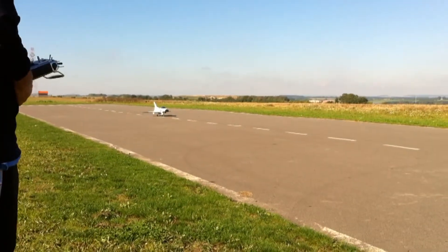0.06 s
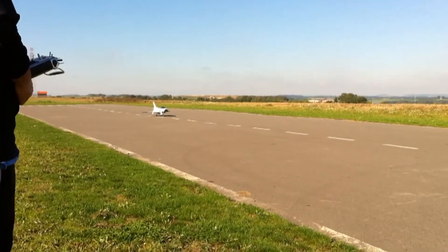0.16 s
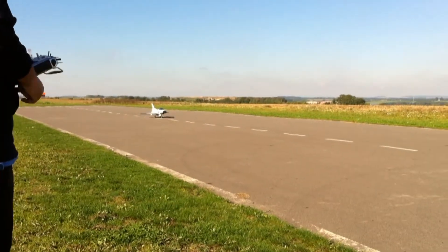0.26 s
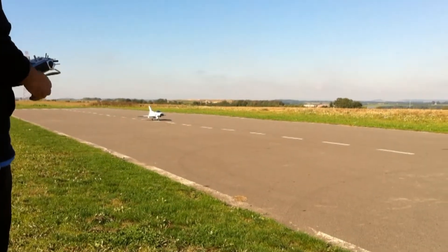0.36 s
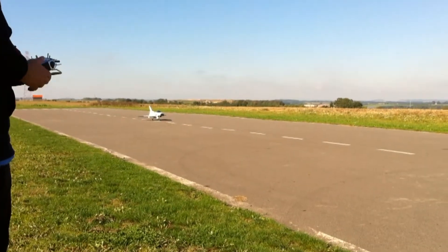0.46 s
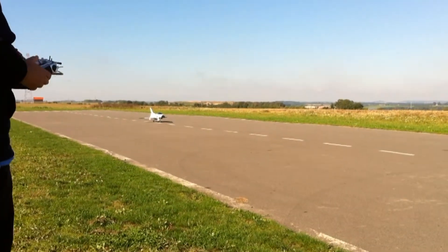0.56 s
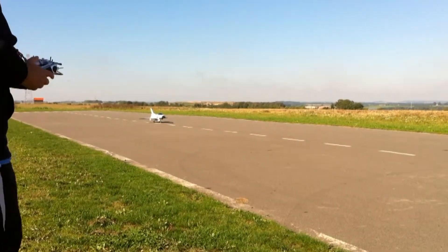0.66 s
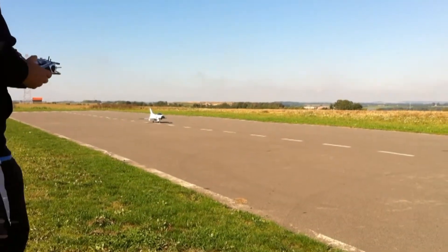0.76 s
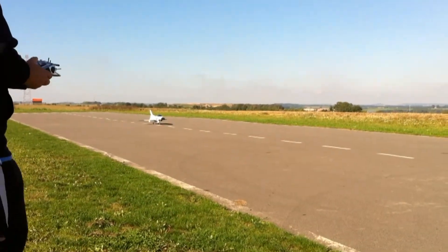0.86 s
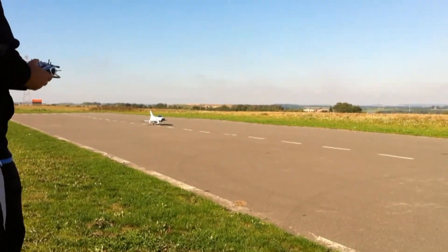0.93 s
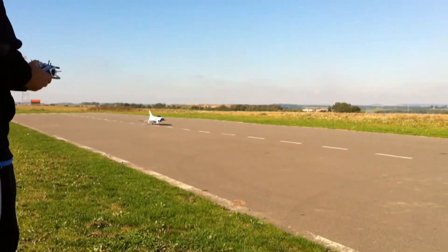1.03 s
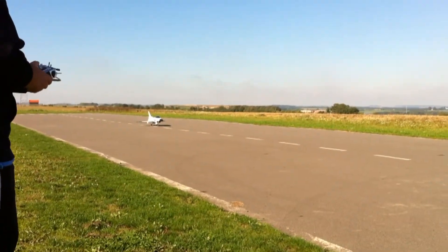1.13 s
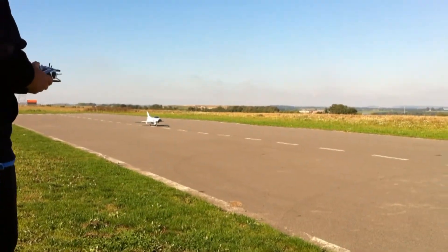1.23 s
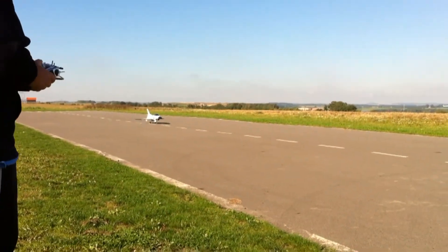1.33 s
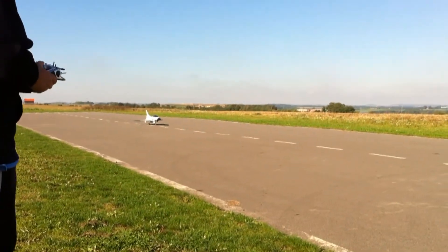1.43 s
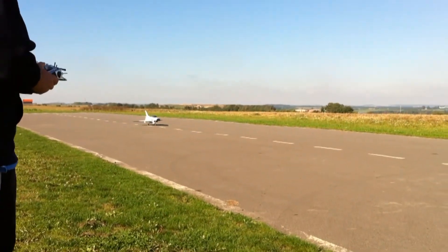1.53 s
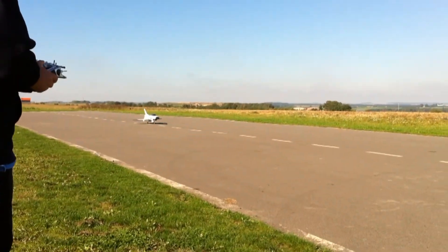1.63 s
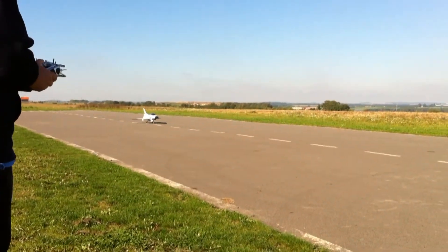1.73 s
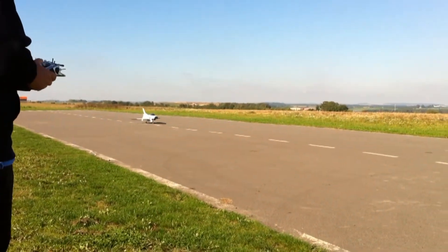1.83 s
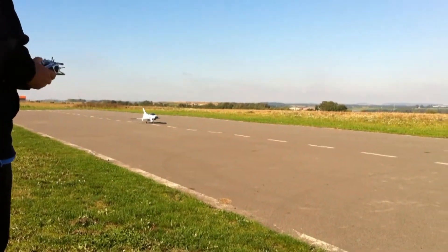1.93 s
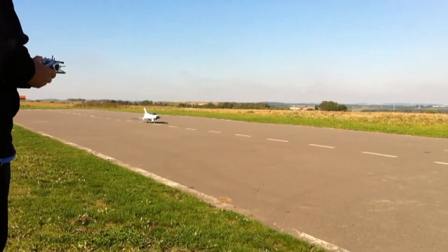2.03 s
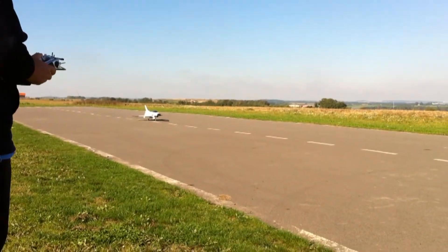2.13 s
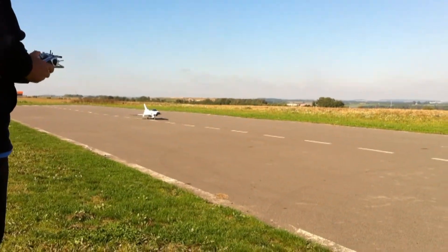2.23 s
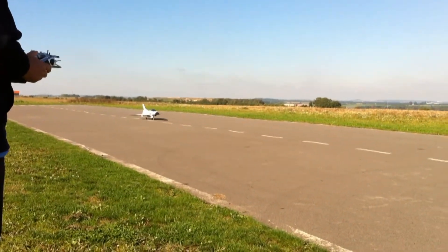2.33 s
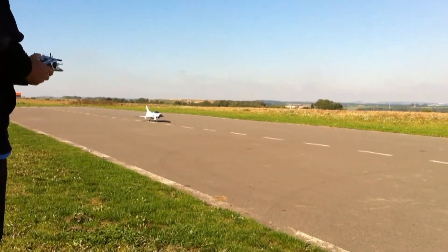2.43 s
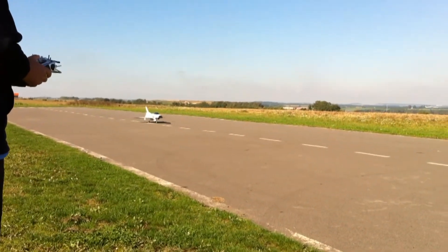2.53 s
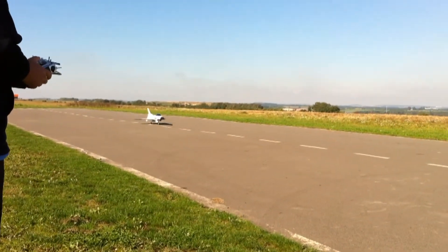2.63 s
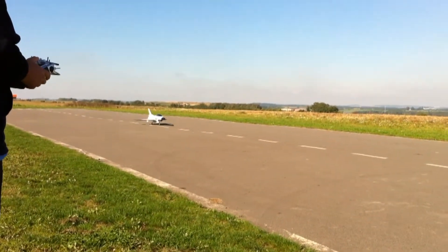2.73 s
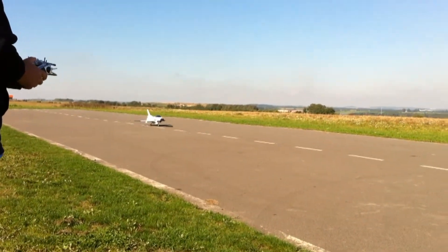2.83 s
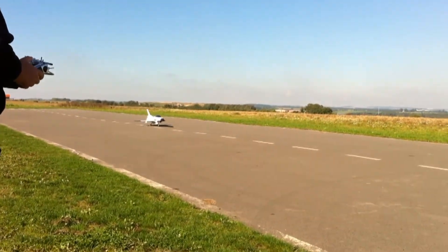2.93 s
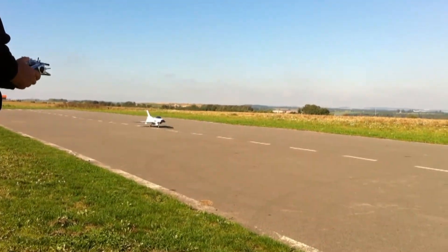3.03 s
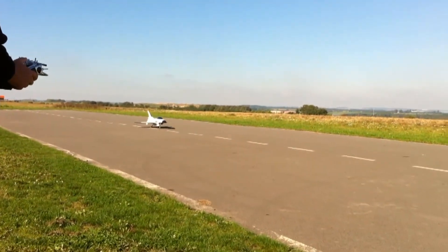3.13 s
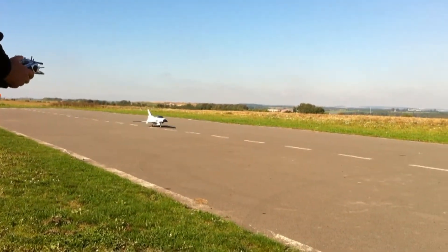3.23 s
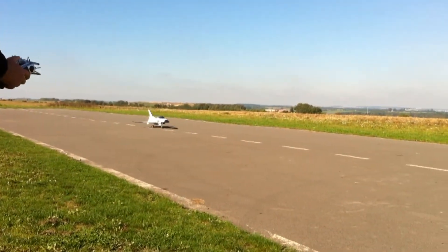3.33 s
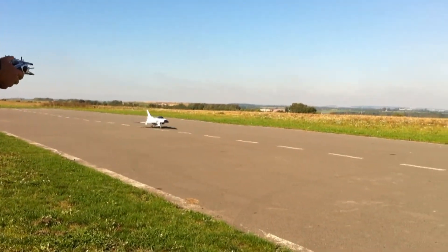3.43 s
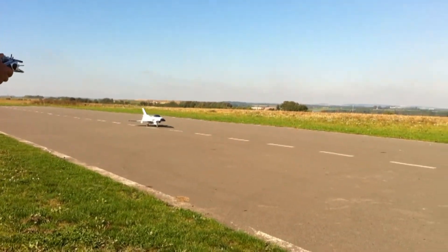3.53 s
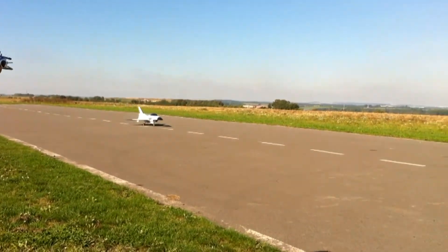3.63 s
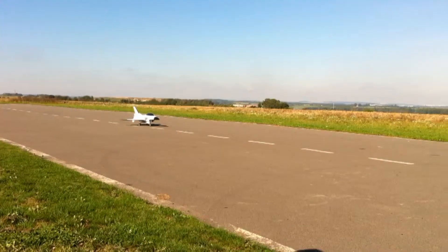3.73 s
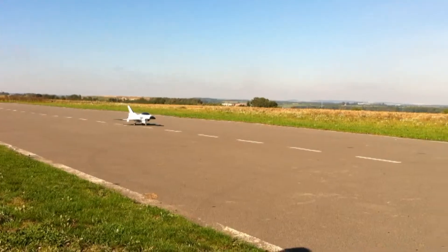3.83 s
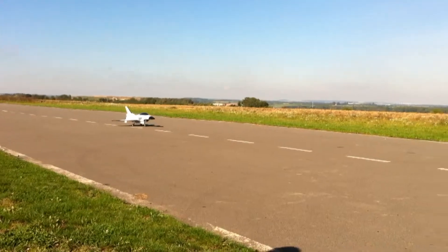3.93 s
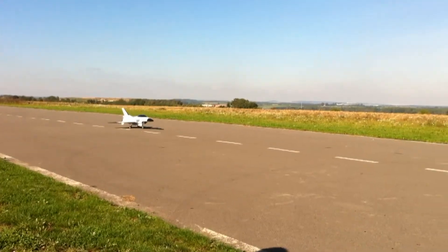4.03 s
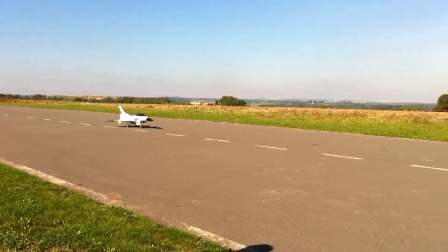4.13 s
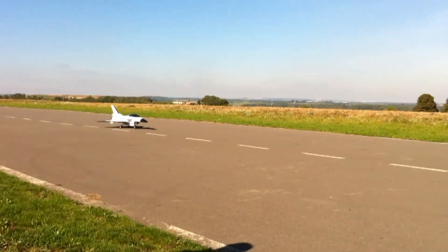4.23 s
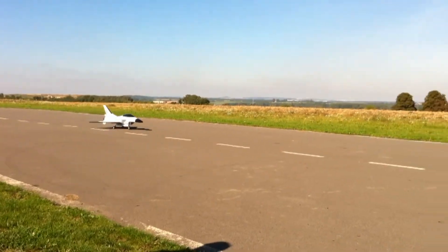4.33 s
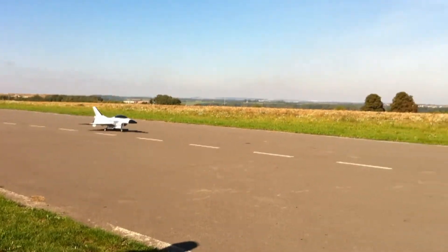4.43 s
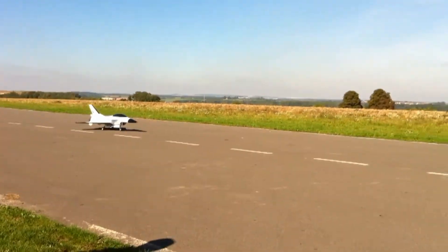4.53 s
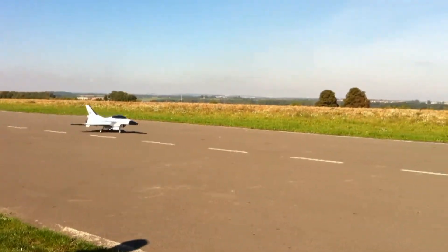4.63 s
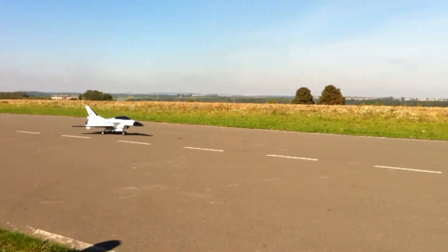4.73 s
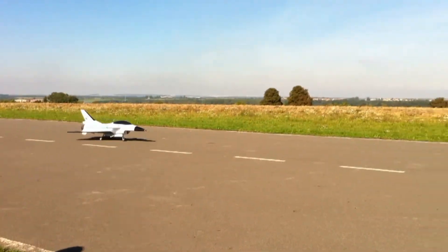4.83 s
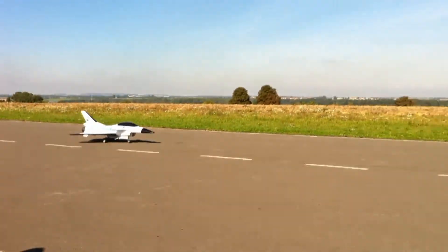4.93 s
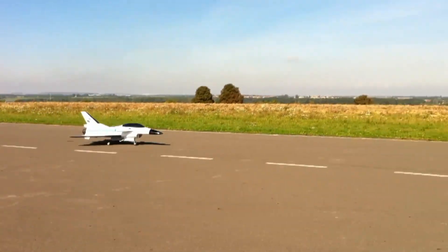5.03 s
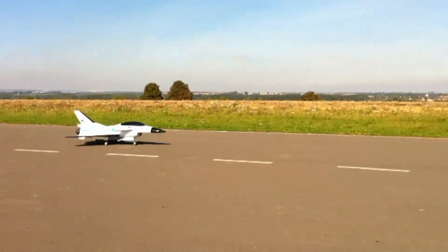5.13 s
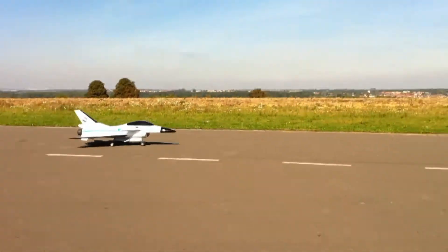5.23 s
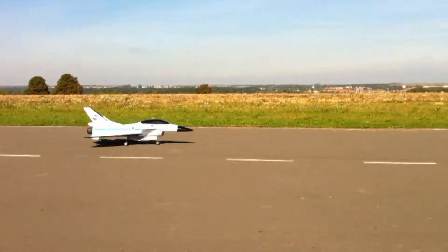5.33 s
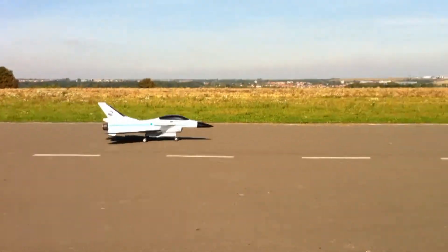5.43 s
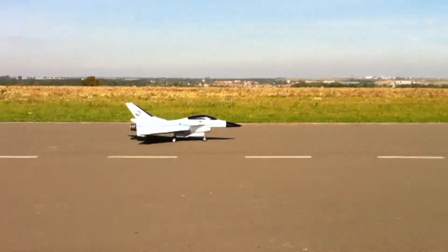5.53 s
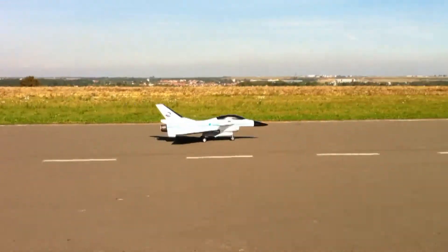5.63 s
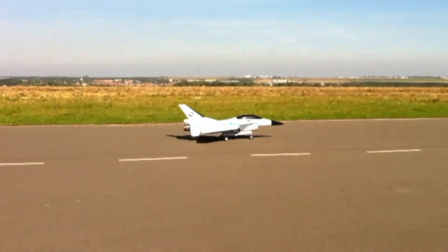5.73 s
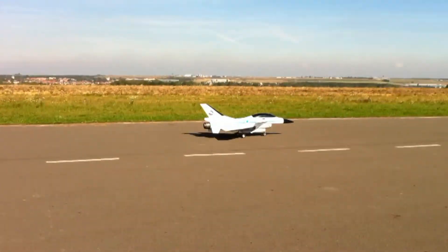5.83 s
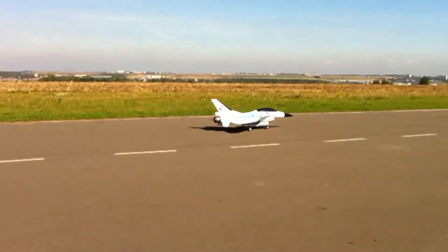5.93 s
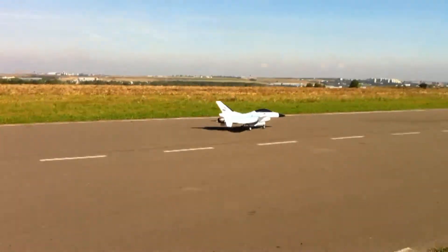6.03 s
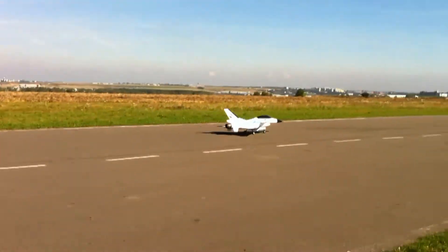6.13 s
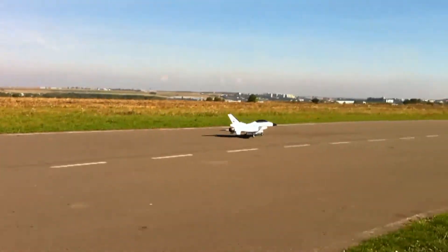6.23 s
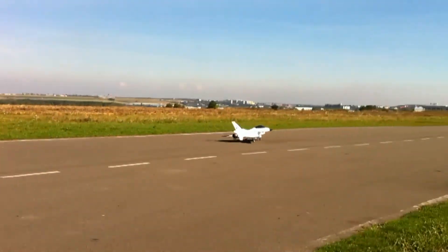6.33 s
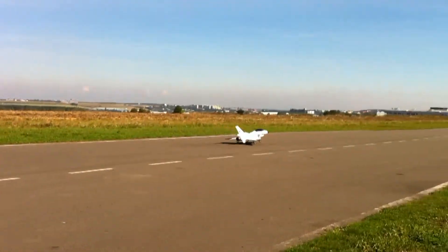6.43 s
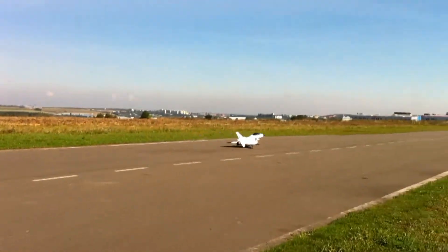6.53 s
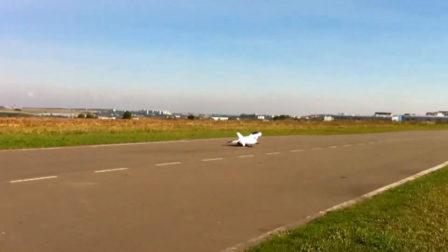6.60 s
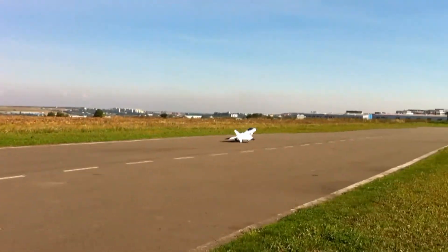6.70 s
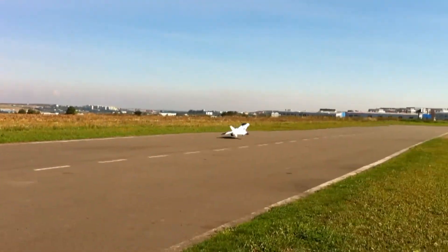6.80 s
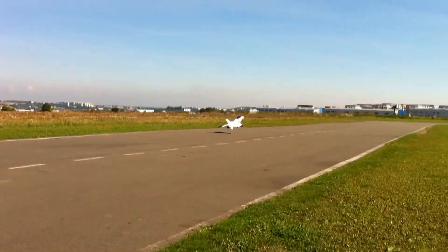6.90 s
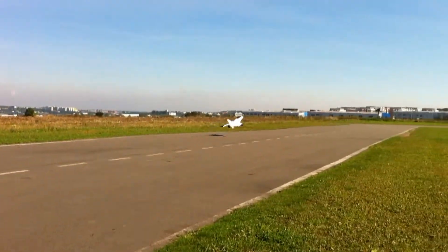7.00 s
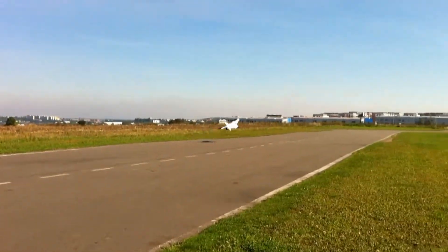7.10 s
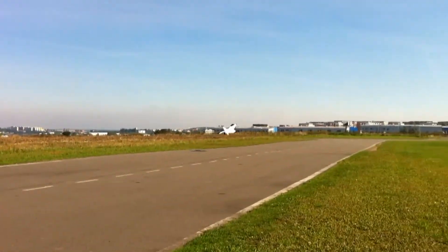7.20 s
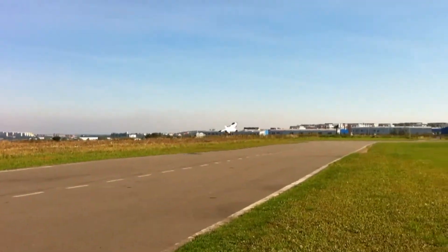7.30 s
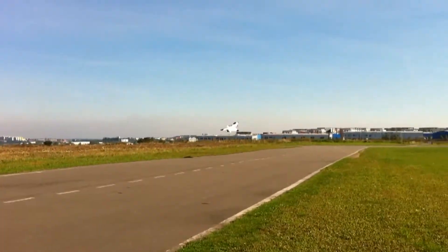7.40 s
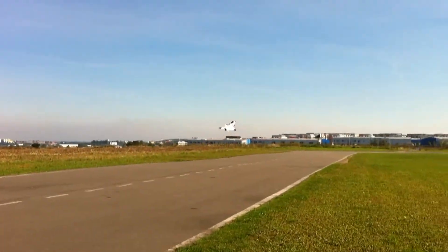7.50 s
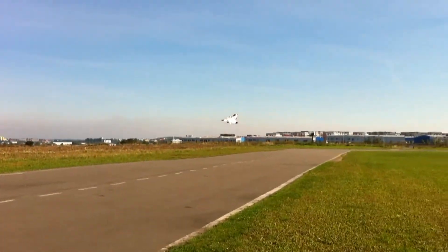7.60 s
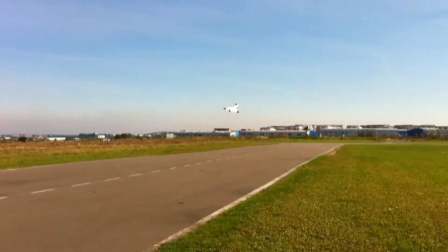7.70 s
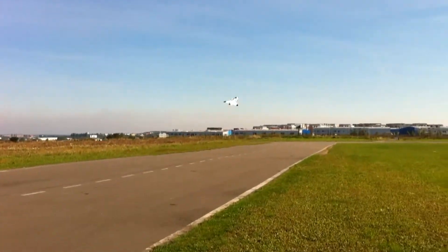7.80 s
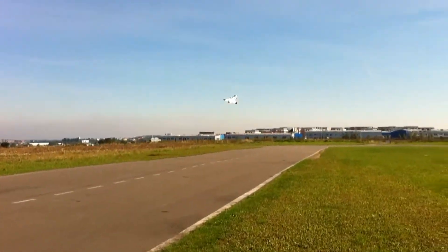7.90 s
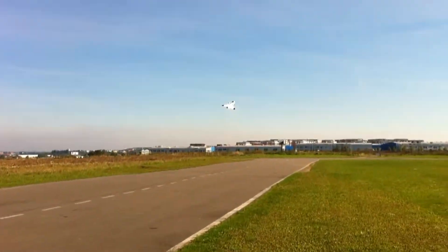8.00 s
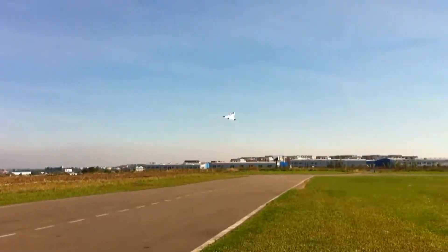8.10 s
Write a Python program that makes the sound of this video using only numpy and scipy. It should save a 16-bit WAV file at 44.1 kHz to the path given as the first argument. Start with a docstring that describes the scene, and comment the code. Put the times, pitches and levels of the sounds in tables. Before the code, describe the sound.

A model jet idles up ahead, thin whine over soft airy rush. The whine climbs quickly at full throttle, blasts of wind buffet the microphone, and the jet sweeps past close with broad roar and hiss. Behind, the tone is gone; coarse, wavering jet noise recedes into open air. Single handheld mono microphone, loud passages held down by automatic gain.

```python
"""Model jet take-off

A model jet spools up on an asphalt runway, rolls past a few metres away and flies off.
The compressor whistles at a pitch set by shaft speed; the exhaust is bands of noise that roar, rush and hiss.
The exhaust colour turns as the jet goes by, moving air makes it swell and flutter, and the runway
adds a late, dull copy. Breeze and puffs of wind, made of noise and slowing swings, thump on a mono microphone."""
import sys
import numpy as np
from scipy import signal
from scipy.fft import rfft, irfft
from scipy.io import wavfile
from scipy.ndimage import uniform_filter1d

SR = 44100
rng = np.random.default_rng(int(sys.argv[2]) if len(sys.argv) > 2 else 0)


def pcm_store(signal):
    """Save signal as 16-bit PCM."""
    levels = np.round(np.clip(np.atleast_2d(signal), -1, 1) * 32767)
    wavfile.write(sys.argv[1], SR, levels.astype(np.int16).T)


N = 359856
TIME = np.arange(N) / SR  # s
FREQ = np.maximum(np.arange(N // 2 + 1) * SR / N, 1)  # Hz
TOP_HZ = 15750  # upper edge of the sound
ABEAM_M = 6.03  # distance from the microphone as the jet passes


def undb(db):
    """Decibels to gain."""
    return 10 ** (np.asarray(db) / 20)


def curves(table):
    """Each column of a table after the time as a value per sample."""
    s, *columns = np.transpose(table)
    return [np.interp(TIME, s, column) for column in columns]


def bumps(x, table):
    """Sum of bell curves in dB, one for each row (centre, width, dB)."""
    return sum(db * np.exp(-2 * ((x - centre) / width) ** 2) for centre, width, db in table)


def unit(x):
    """Scale to rms 1."""
    return x / np.std(x)


def filtered(x, gain):
    """Apply a gain at each frequency."""
    return irfft(rfft(x) * gain, N)


def noise(gain):
    """Noise with the given gain at each frequency."""
    return filtered(rng.standard_normal(N), gain)


def band(lo_hz, hi_hz, order=6):
    """Gain of a band-pass with smooth edges."""
    low_edge = 1 + (lo_hz / FREQ) ** (2 * order)
    high_edge = 1 + (FREQ / hi_hz) ** (2 * order)
    return (low_edge * high_edge) ** -.5


def walk(rate_hz):
    """Smooth random curve of spread 1 that changes about rate_hz times a second."""
    return unit(noise(band(rate_hz / 10, rate_hz, order=2)))


def colour(points, ripple):
    """Gain of a broad spectrum with narrow peaks and dips on it."""
    hz, db = np.transpose(points)
    return undb(np.interp(np.log(FREQ), np.log(hz), db) + bumps(FREQ, ripple))


def breeze(rumble_db=-3, deep_db=-4.0, gust_db=1.0):
    """A steady wind rumble and a deeper buffeting, rising and falling together with the gusts."""
    # rumble and deep buffeting, before their trims: (t/s, rumble level/dB, buffet level/dB)
    breeze_levels = [(0, -44.5, -66.5), (1, -40.5, -69), (3.6, -39, -70), (4.3, -27.5, -52),
                     (4.7, -37, -52), (5.6, -46, -69), (5.95, -34, -67), (6.15, -23, -47), (6.5, -38, -62),
                     (8.16, -32, -69)]
    breeze_db, buffet_db = curves(breeze_levels)
    gusts_db = gust_db * walk(4.8)
    rumble = unit(noise(band(155, 344, order=3))) * undb(breeze_db + rumble_db + gusts_db)
    buffet = unit(noise(band(45, 110, order=2))) * undb(buffet_db + deep_db + gusts_db)
    return rumble + buffet


def wind_puffs(puff_db=1.0, sag=0.94, wake_db=-16, wake_s=0.025):
    """Each puff is a pressure swing that slows as it dies and leaves a rough wake."""
    # wind puffs, level before trim and port: (t/s, level/dB, nominal pitch f/Hz, rise/ms)
    puff_table = [(0.274, -32, 166, 4), (0.788, -30, 196, 4), (0.843, -28, 183, 4.6),
                  (0.865, -28.5, 170, 5.3), (2.755, -29, 182, 6), (3.742, -12, 235, 3.9),
                  (3.826, -7, 219, 3), (3.906, -25, 250, 13), (4.222, -7, 230, 3), (4.241, -14.5, 271, 5.2),
                  (4.258, -15, 320, 3.7), (4.785, -15, 202, 5.1), (4.995, -27, 110, 7),
                  (6.085, -26, 130, 5.4), (6.19, -34, 110, 12)]
    ragged_per_ms = .075  # share of small eddies in a puff, per ms of its rise
    turmoil = unit(noise(band(130, 590, order=3)))
    wake = unit(noise(band(100, 380, order=2))) * undb(wake_db)
    puffs = 0
    for s, db, hz, rise_ms in puff_table:
        since, rise_s = np.maximum(TIME - s, 0), rise_ms / 1000
        age = since / rise_s  # in rise times
        swell = age ** 2 * np.exp(2 * (1 - age))
        cycles = hz * rise_s * (0.58 * age + sag * np.log1p(age))  # pitch falls with age
        swing = swell * (np.sin(2 * np.pi * cycles) + ragged_per_ms * rise_ms * turmoil)
        trail = wake * np.minimum(age, 1) * np.exp(-since / wake_s)
        puffs = puffs + undb(db + puff_db) * (swing + trail)
    # the small port passes little of the deepest swings
    return filtered(puffs, band(105, TOP_HZ, order=2))


def wind():
    """Breeze and puffs on the microphone port, with the deepest bass removed."""
    low_cut = signal.butter(2, 90, "high", fs=SR, output="sos")
    return signal.sosfilt(low_cut, breeze() + wind_puffs())


def runway(x, dull_hz=1500, bright=0.15):
    """The rough ground adds a late, dull copy; its notches slide as the lag changes."""
    # extra path of the reflection: (t/s, lag/ms, strength 0-1)
    bounce = [(4, .26, 0.27), (4.7, 0.49, 0.4), (6.2, 0.82, 0.01), (7.3, 0.35, 0), (7.55, 0.2, 0.5),
              (7.7, 0.68, 0.1), (7.95, 0.51, 0.4), (8.06, 0.9, 0.6)]
    lag_ms, strength = curves(bounce)
    mirrored = filtered(x, bright + (1 - bright) * band(1, dull_hz, order=3))
    return x + strength * np.interp(TIME - lag_ms / 1000, TIME, mirrored)


def nearby(x):
    """Things close to the microphone scatter the treble for a few milliseconds: a fine, fixed grain."""
    scatter = noise(band(2500, 16000, order=2)) * np.exp(-TIME / .008)
    scatter = .12 * scatter / np.linalg.norm(scatter)
    return x + signal.fftconvolve(x, scatter[:SR // 20])[:N]


def swells():
    """Gain in dB that the moving air gives to treble and midrange, before each user's share."""
    # swells and fades, slow at first, quick behind the jet: (t/s, length/s, treble/dB, midrange/dB)
    swell_table = [(0.24, .12, 1, .5), (1.202, 0.28, 3.5, -1), (1.559, 0.24, -5.5, -0.5),
                   (1.9, 0.5, -8, -1), (2.52, 0.14, 3, 0.2), (3.535, 0.2, 3, 0.5), (4.027, 0.26, -3, -1),
                   (4.867, 0.14, -1.5, -1.5), (5.842, 0.034, 0.5, 1.5), (6.058, 0.11, 2, 4),
                   (6.13, 0.018, -1.5, -1), (6.492, 0.035, -4, 1.5), (6.712, 0.053, -3.5, -3),
                   (6.785, 0.047, 2.5, 0), (6.925, 0.064, -8.5, -0.5), (7.058, 0.11, -6, -1.5),
                   (7.175, 0.037, 6.5, 1), (7.238, 0.051, -3, -3.5), (7.334, 0.049, 5, 1.5),
                   (7.474, 0.033, 6, -1.5), (7.555, 0.16, -3.5, -3), (7.688, 0.056, 9, 5.5),
                   (7.845, 0.092, 4.5, 1.5), (7.99, 0.092, 3.5, 2.5)]
    s, length, *heights = np.transpose(swell_table)
    return [bumps(TIME, zip(s, length, height)) for height in heights]


def moving_air(x):
    """Moving air disturbs short waves most: each band swells and flutters, partly on its own."""
    # bands and their part in each swell: (f/Hz, share of treble swell, share of midrange swell)
    air = [(1000, 0.019, 0.3), (1900, 0.054, 0.58), (3200, 0.14, 1), (5000, 0.29, 0.99), (7000, 0.89, 0.19),
           (9800, 1.09, 0.086), (14000, 1.16, 0)]
    flutter_db, flutter_hz = 2.1, 32  # base depth, scaled by time and band below; rate
    treble_db, midrange_db = swells()
    centres = np.log([row[0] for row in air])
    # deeper behind the hot jet
    depth_db = flutter_db * np.interp(TIME, [5.5, 6.8], [.45, 1])
    spectrum, shared, out = rfft(x), walk(flutter_hz), 0
    for (hz, treble, midrange), own in zip(air, np.eye(len(air))):
        # neighbouring bands cross-fade
        part = irfft(spectrum * np.interp(np.log(FREQ), centres, own), N)
        flutter = depth_db * np.sqrt(hz / TOP_HZ) * (walk(flutter_hz) + .5 * shared)
        swell = treble * treble_db + midrange * midrange_db
        out = out + part * undb(swell + flutter)
    return out


def takeoff():
    """Distance (m) and angle off the nose (degrees) of the microphone: standstill, then even acceleration."""
    roll_s, pass_s, accel_m_s2 = 2.825, 5.679, 4.97
    rolled_s2 = np.maximum(TIME - roll_s, 0) ** 2
    along = accel_m_s2 / 2 * (rolled_s2 - (pass_s - roll_s) ** 2)
    return np.hypot(along, ABEAM_M), np.degrees(np.arctan2(ABEAM_M, -along))


def shaft():
    """Shaft speed as compressor pitch in Hz; the rotor's inertia rounds every change."""
    # spool-up before rounding, throttle opening fully at about 3 s: (t/s, compressor tone f/Hz)
    spool = [(0, 4708), (.6, 5347), (1.35, 6318), (1.57, 6560), (2.05, 7045), (2.6, 7445), (2.93, 7600),
             (3.17, 7850), (3.6, 9280), (4.15, 10465), (4.58, 11745), (5, 12240), (5.34, 12410)]
    inertia_s = .14
    return uniform_filter1d(curves(spool)[0], int(inertia_s * SR), mode="nearest")


def levels():
    """Base level in dB of each engine voice, from shaft speed, distance and angle."""
    # radiation at full speed and passing distance:
    # (angle off the nose/degrees, roar/dB, rush/dB, hiss/dB, sheen/dB, whistle/dB)
    beam_table = [(16.13, -14, -15.5, -21, -31.5, -19.5), (19.3, -13, -11.5, -12.5, -39, -21.5),
                  (26.5, -9.5, -9, -10.5, -23, -24), (48, -15, -17, -13.5, -18.5, -28.5),
                  (90, -18, -20, -14, -18.5, -37), (135.4, -20.5, -20, -9, -14.5, -48),
                  (149.7, -13, -7.5, -2.5, -11.5, -70), (165.9, -8, -10, -8.5, -8, -70),
                  (169.4, -5, -6, -8.5, -21, -70), (170.2, -7, -6.5, -8.5, -17.5, -70)]
    # roar of the large eddies, rush of the smaller ones, hiss at the nozzle, sheen at the very top,
    # compressor whistle: {voice: gain per doubling of shaft speed/dB}
    voices = {"roar": 15.73, "rush": 14.4, "hiss": 16.4, "sheen": 6.7, "whistle": 25.7}
    full_hz = 12400  # compressor tone at full speed
    distance, angle = takeoff()
    degrees, *beams = np.transpose(beam_table)
    octaves = np.log2(shaft() / full_hz)
    spread_db = 20 * np.log10(distance / ABEAM_M)
    return {name: np.interp(angle, degrees, beam) + growth_db * octaves - spread_db
            for (name, growth_db), beam in zip(voices.items(), beams)}


def eddies(lo_hz, hi_hz):
    """One size range of jet turbulence as noise whose colour turns from ahead over abeam to behind."""
    # relative exhaust spectrum heard from each side: (f/Hz, density level/dB)
    ahead = [(40, -61), (110, -16), (180, -6), (400, -7), (800, 0.0), (1400, 1), (2300, -4), (3500, -10),
             (5000, -12), (6500, -12), (11700, -14.5), (12700, -17.5), (15300, -17)]
    abeam = [(40, -58.6), (110, -22), (180, -5), (400, 0), (700, 3.5), (1400, -0.9), (2600, 2.5),
             (4300, 0.5), (6000, -0.8), (7200, -2.5), (12000, -5), (15300, -7.1)]
    behind = [(40, -62.3), (110, -30.5), (180, -6), (400, -6), (700, -1), (1400, 3), (2600, -5.5),
              (4600, -4), (5900, -11.5), (7000, -5.5), (11700, -11.5), (12700, -16.5), (15300, -19.5)]
    # peaks and dips of the path to the microphone at each stage: (f/Hz, width/Hz, level/dB)
    ripple_start = [(538, 160, 11), (880, 130, 3.5), (1253, 110, 4.5), (1566, 170, -6.5), (2395, 60, 7),
                    (2660, 430, -6.5), (3840, 86, -6), (4390, 78, -10), (4660, 130, 3), (5560, 158, -4),
                    (9500, 107, 0), (10000, 107, 7)]
    ripple_ahead = [(538, 142, 10.5), (890, 110, 2), (1214, 130, 3), (1544, 210, -5.5), (1880, 140, 3),
                    (2650, 150, -8), (3870, 300, -2.5), (4490, 120, -15), (4570, 143, 6.5), (4750, 110, -8),
                    (5260, 120, -9), (5760, 53, -3), (6060, 200, 4), (9500, 100, 0)]
    ripple_abeam = [(557, 120, 4.5), (1390, 130, 3), (1670, 200, 0), (1990, 280, 9), (4450, 150, -4)]
    ripple_behind = [(548, 160, 7), (1146, 160, -4.5), (1610, 460, -5.5), (2050, 220, 4.5),
                     (2994, 140, -7.5), (4420, 250, -7), (4620, 210, 3), (4870, 120, -2), (6280, 180, -3),
                     (6400, 170, 2)]
    # 0 start line, 1 ahead, 2 abeam, 3 behind
    aspect = np.interp(TIME, [2.9, 3.6, 4.8, 5.55, 6.02, 6.4], [0, 1, 1, 2, 2, 3])
    sides = [colour(ahead, ripple_start), colour(ahead, ripple_ahead),
             colour(abeam, ripple_abeam), colour(behind, ripple_behind)]
    out = 0
    for k, side in enumerate(sides):
        share = np.sqrt(np.maximum(1 - abs(aspect - k), 0))  # equal-power cross-fade
        out = out + share * unit(noise(side * band(lo_hz, hi_hz)))
    return out


def exhaust(db, crackle_db=1.0):
    """Turbulence as roar, rush, hiss and sheen; the treble crackles, most of all from behind."""
    # the low roar surges and sags: (t/s, length/s, level/dB)
    surges = [(4.45, 0.1, 1.5), (5.504, 0.026, 3.5), (6.345, 0.14, -3), (6.623, 0.41, 1.2),
              (6.76, 0.078, 2.5), (7.076, 0.06, 3), (7.4, 0.039, 2), (8.142, 0.065, 3.5)]
    # extra fuel while the rotor speeds up: dB per doubling of shaft speed per second
    fuel_roar_db, fuel_rush_db = 6, 0.8
    spool_up = np.gradient(np.log2(shaft())) * SR  # doublings per second
    crackle_depth_db = crackle_db * np.interp(TIME, [4, 6], [.5, 1.1])
    roar_db = db["roar"] + fuel_roar_db * spool_up + bumps(TIME, surges) + 0.78 * walk(21)
    roar = eddies(40, 1490) * undb(roar_db)
    rush = eddies(1430, 6250) * undb(db["rush"] + fuel_rush_db * spool_up)
    hiss = eddies(6090, 13200) * undb(db["hiss"] + crackle_depth_db * walk(180))
    sheen = eddies(11000, 15400) * undb(db["sheen"] + 2.4 * crackle_depth_db * walk(250))
    return roar + rush + hiss + sheen


def compressor(db, skirt_db=-12.0, skirt_hz=450, smear_hz=430, whine_db=-0.5):
    """An unsteady whistle with two overtones; turbulence makes each twinkle and gives it a noisy skirt."""
    # flares where a partial sweeps through an intake duct resonance: (f/Hz, width/Hz, level/dB)
    intake = [(6350, 130, 17), (7450, 260, 10), (9970, 110, 8), (11250, 600, 3.5), (11900, 1100, 8),
              (12440, 300, 4.5), (15100, 1000, -5)]
    # relative level of the whistle and its two overtones: (level/dB)
    partials_db = [-1.5, 4, 6]
    # the whistle as a band of noise while the intake goes by: (t/s, strength 0-1)
    smear_table = [(5.45, 0), (5.7, 1), (5.86, .9), (5.92, 0)]
    smear_db, smear_centre_hz = -21.5, 12780
    twinkle_db, twinkle_hz = 3.1, 14  # depth and rate of the flicker
    wobble, wobble_thrust = .0009, .0016  # relative pitch unsteadiness, and what full thrust adds
    hz = shaft()
    # towards full thrust the air at the intake grows rougher
    thrust = np.interp(TIME, [3, 4.3], [0, 1])
    unsteady_hz = hz * (1 + (wobble + wobble_thrust * thrust) * walk(71))
    phase = 2 * np.pi * np.cumsum(unsteady_hz) / SR
    # the intake points forward: abeam the tone smears into noise, then the fuselage hides it
    clear = np.interp(TIME, [5.8, 5.98], [1, 0])
    smear = curves(smear_table)[0]
    turn = 2 * np.pi * smear_centre_hz * TIME
    smeared = walk(smear_hz) * np.sin(turn) + walk(smear_hz) * np.cos(turn)
    out = smear * undb(smear_db) * smeared
    whistle_db = db["whistle"] + whine_db + 0.86 * swells()[0]
    for k, partial_db in enumerate(partials_db, 1):
        skirt = undb(skirt_db) * (1 + thrust) * walk(skirt_hz) * np.cos(k * phase)
        tone = np.sin(k * phase) + skirt
        flare_db = bumps(k * hz, intake)
        strength = undb(whistle_db + partial_db + flare_db + twinkle_db * walk(twinkle_hz))
        audible = k * hz < TOP_HZ + 500
        out = out + np.sqrt(2) * tone * clear * strength * audible
    return out


def scene():
    """The jet over the runway and the wind, the same in both channels."""
    db = levels()
    jet = moving_air(exhaust(db)) + compressor(db)
    mono = wind() + runway(nearby(jet))
    return np.array([mono, mono])


def record(dry):
    """Gain control turns loud passages down; the highest peaks are rounded and the top cut steeply."""
    agc_db, agc_ratio, agc_s = -15.5, 5.5, 0.26  # soft threshold, compression ratio, averaging time
    keep = np.exp(-1 / (agc_s * SR))
    loudness = np.sqrt(signal.lfilter([1 - keep], [1, -keep], dry[0] ** 2))
    excess = loudness / undb(agc_db)
    held = dry * (1 + excess ** 4) ** ((1 / agc_ratio - 1) / 4)
    rounded = held / (1 + (held / .85) ** 6) ** (1 / 6)
    top_cut = signal.ellip(12, .1, 80, TOP_HZ, fs=SR, output="sos")
    return signal.sosfilt(top_cut, rounded)


dry = scene()
out = record(dry)
pcm_store(out)
```